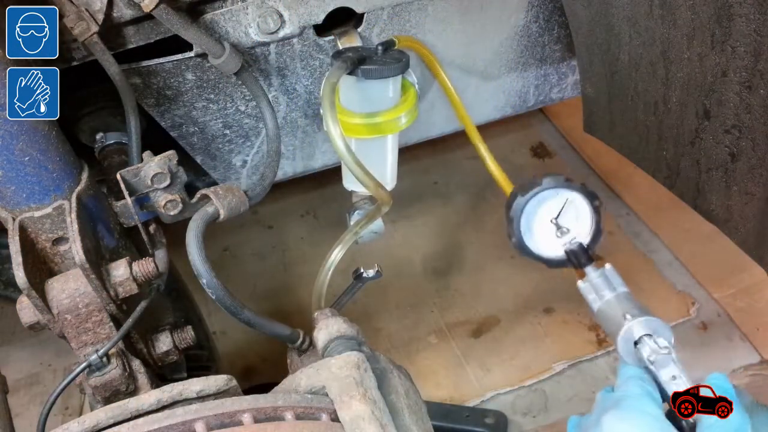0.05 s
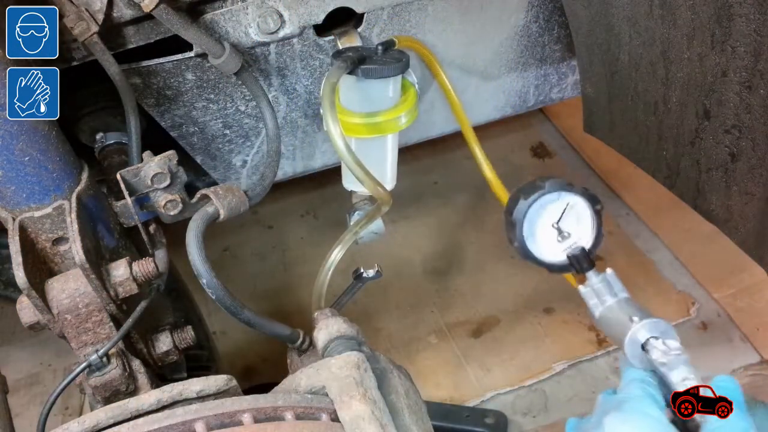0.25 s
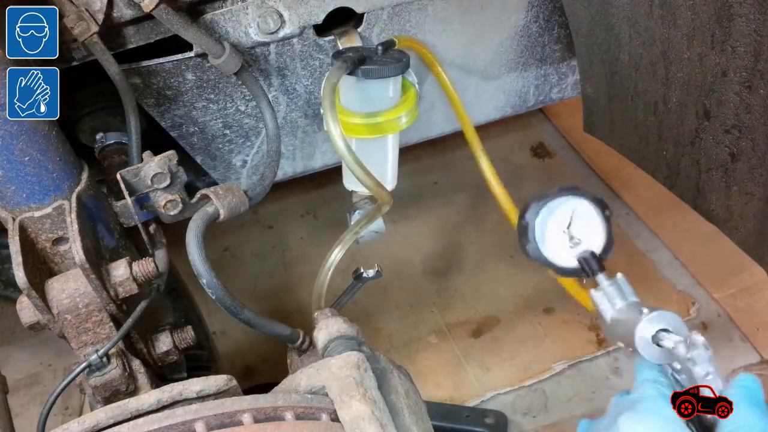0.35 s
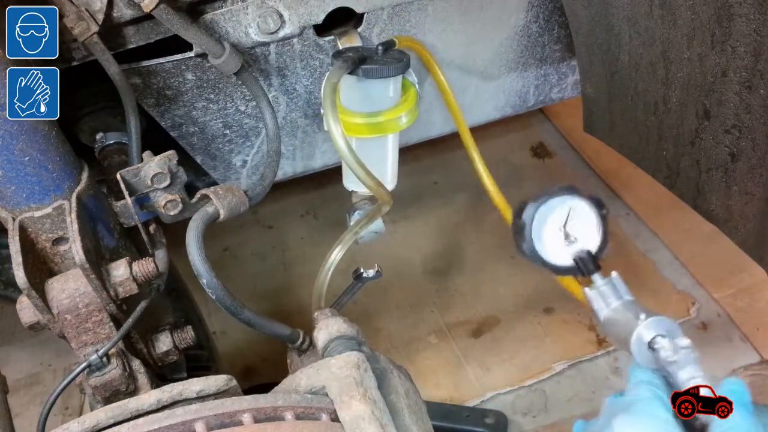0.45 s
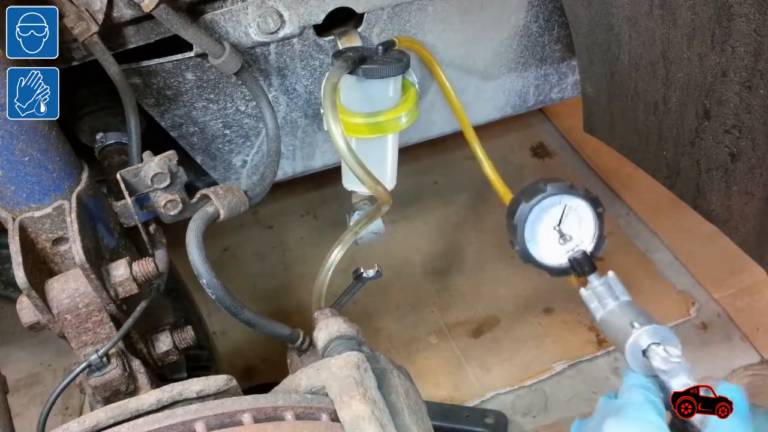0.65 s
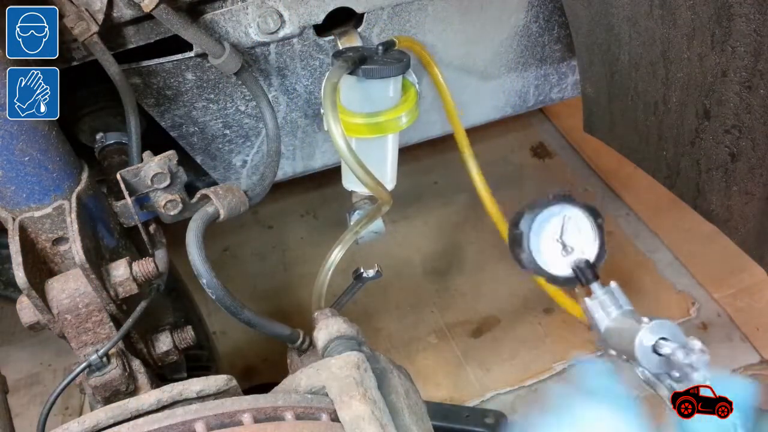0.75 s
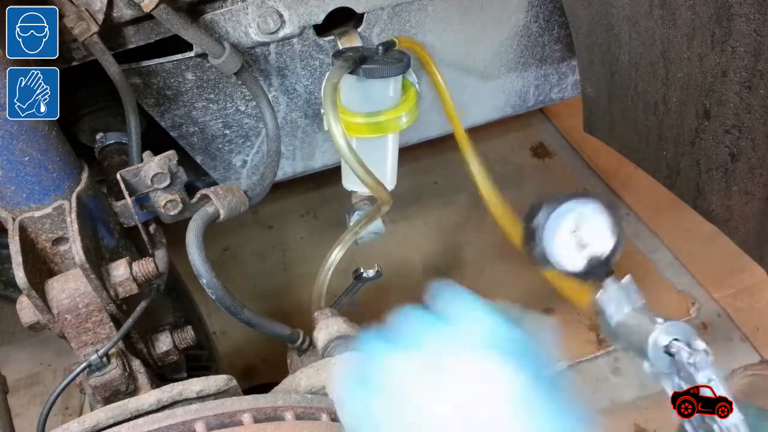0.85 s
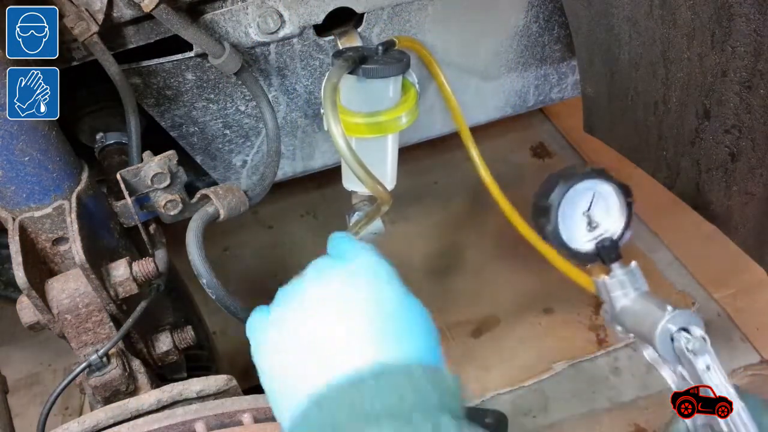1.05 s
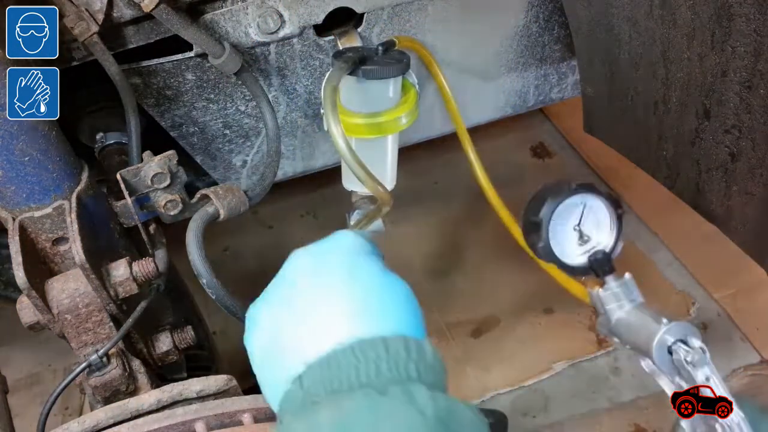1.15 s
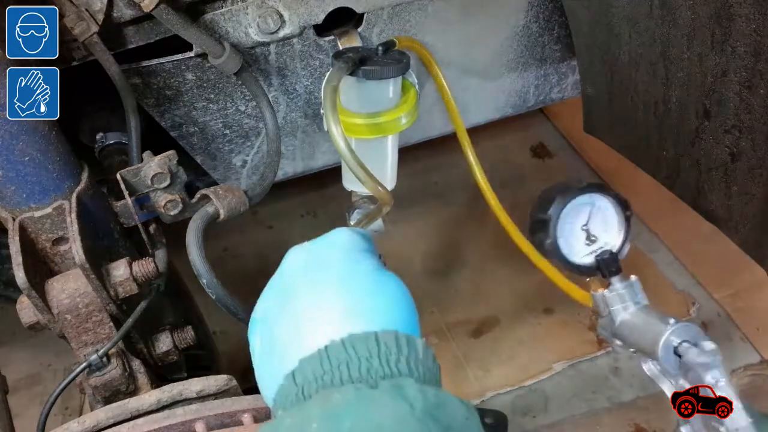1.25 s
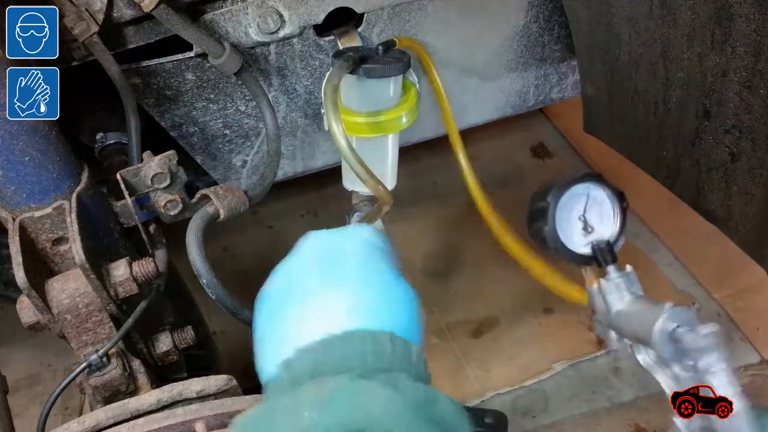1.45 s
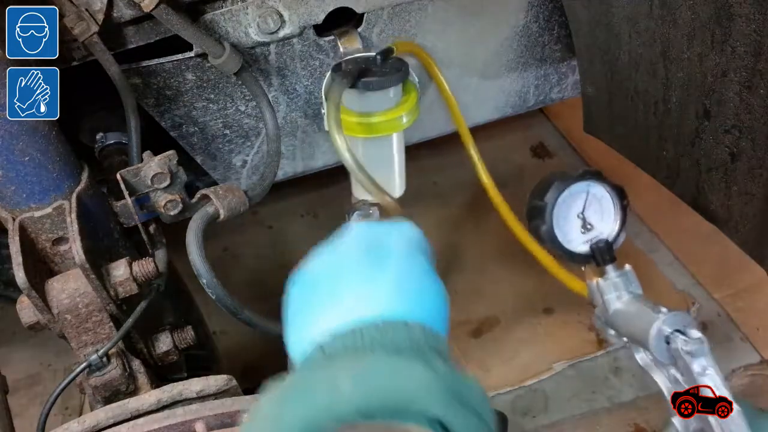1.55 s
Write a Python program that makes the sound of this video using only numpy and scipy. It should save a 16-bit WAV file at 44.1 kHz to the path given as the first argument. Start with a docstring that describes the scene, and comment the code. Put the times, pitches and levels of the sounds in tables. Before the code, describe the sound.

A hand vacuum pump squeezed three times, each a dull knock and sharp airy hiss

```python
"""In a quiet workshop, a hand vacuum pump is squeezed three times close by. Each squeeze starts with a dull
knock: a short push that makes the pump body ring. Then air jets out of the exhaust valve, made of noise
shaped by the resonances of the barrel; after the last squeeze the valve leaks a thin, high hiss.
Faint sucks of air come before the first two squeezes. The spring squeaks, the handle ticks,
and a glove and a sleeve rustle (short or long noises) over a low room hum."""
import sys
import numpy as np
from scipy import signal
from scipy.fft import rfft, irfft
from scipy.io import wavfile
from scipy.ndimage import uniform_filter1d

SR = 44100
rng = np.random.default_rng(int(sys.argv[2]) if len(sys.argv) > 2 else 0)


def log_audio(samples):
    """Write samples as a 16-bit WAV file to the path given in sys.argv[1]."""
    # one column per channel
    frames = np.atleast_2d(samples).T
    # limit to full scale, then quantise
    limited = np.clip(frames, -1, 1)
    pcm = np.round(limited * 32767).astype(np.int16)
    wavfile.write(sys.argv[1], SR, pcm)


def nominal_scale(level):
    """Amplitude ratio for a level in decibels (scalar or array-like)."""
    x = np.asarray(level, float) / 20
    return 10 ** x


N = 70560  # samples, 1.6 s


def evened(x):
    """Scale a sound to an rms of 1."""
    return x / np.sqrt(np.mean(x ** 2) + 1e-20)


def read(points, hz):
    """Read a curve of (frequency, value) points along a logarithmic frequency axis."""
    f, value = np.transpose(points)
    return np.interp(np.log(hz + 1), np.log(f + 1), value)


def add(mix, start_s, sound):
    """Add a sound into the mix at its start time, cut off at the end of the mix."""
    part = mix[:, round(start_s * SR):][:, :sound.shape[-1]]
    part += sound[..., :part.shape[1]]


def pan(db):
    """Left and right gains that differ by db; positive is louder on the left."""
    return nominal_scale(np.array([[db / 2], [-db / 2]]))


def noise(gain, same, size=N):
    """Two channels of noise with the spectrum gain(hz), rms 1; same is how alike they are, 0 to 1."""
    hz = np.fft.rfftfreq(size, 1 / SR)
    a, b = rfft(rng.standard_normal((2, size)))
    alike = np.clip(same(hz) if callable(same) else same, 0, 1)
    right = alike * a + np.sqrt(1 - alike ** 2) * b
    return evened(irfft(np.array([a, right]) * gain(hz), size))


def hiss(modes, same, spread=1):
    """Air turbulence: noise colored by resonances, with a level that gusts at random."""
    def gain(hz):
        power = 0
        for mode_hz, width_hz, db, left_right_db in modes:
            off_center = 2 * (hz - mode_hz) / width_hz / spread
            power = power + (nominal_scale(db) * pan(left_right_db)) ** 2 / (1 + off_center ** 2) ** 2
        return np.sqrt(power)

    gust_db, gust_hz = 1.5, 60  # rms swing, and where faster gusts start to weaken
    gust = noise(lambda hz: 1 / (1 + (hz / gust_hz) ** 2), 0.54)[0]
    return noise(gain, same) * nominal_scale(gust_db * gust)


def level(tables, *cols):
    """Gain over time from curve tables, adding the dB of the given columns; silent outside each curve."""
    t, out = np.arange(N) / SR, np.zeros(N)
    for rows in tables:
        rows = np.array(rows)
        out += nominal_scale(np.interp(t, rows[:, 0], rows[:, list(cols)].sum(1), -200, -200))
    return uniform_filter1d(out, size=150)


def grainy(size):
    """Fast gain flicker, as from many small fibres."""
    grain_db = 2.5  # dB per unit of grain
    grain = np.repeat(rng.exponential(1, size // 18 + 1), 18)[:size]
    return nominal_scale(grain_db * (uniform_filter1d(grain, size=40) - 0.5))


# Range of delays of close reflections: shortest_s, longest_s
ECHO_DELAYS = (.003, .016)


def echoes(x):
    """A few close reflections off nearby surfaces ripple the spectrum."""
    count, echo_db = 12, -16  # level of each echo next to the direct sound
    taps = np.zeros(SR // 20)
    places = (SR * rng.uniform(*ECHO_DELAYS, size=count)).astype(int)
    taps[places] = nominal_scale(echo_db) * rng.choice([-1., 1.], size=count)
    taps[0] = 1  # direct sound
    return signal.oaconvolve(x, taps[None] / np.linalg.norm(taps), axes=1)[:, :N]


# Exhaust air, one curve per squeeze: time_s, level_db, then bands over that level: treble_db, middle_db, top_db
FLOW_CURVES = [
    [(0.18, -74, -9, -8, -10), (0.196, -65.5, 9, 1, 3), (0.206, -52, 6.5, 2, 3), (0.221, -40, 5, 1, 2),
     (0.233, -39, 8.5, 1, 7), (0.317, -40.5, 4.5, -0.5, -0.5), (0.347, -49.5, 6.5, 5, 5.5),
     (0.384, -54.5, 2, -2, -3), (0.42, -80.5, 9, 8, -3)],
    [(0.645, -80, 2, -22, -6), (0.657, -57.5, 6, 1, 6), (0.675, -43, 9, -1, 1.5), (0.711, -39, 6.5, 0, 3.5),
     (0.723, -41.5, 9, -6, 0), (0.747, -41, 5.5, 4, 4.5), (0.798, -50, 3, -1.5, 1.5),
     (0.83, -72, 4, 7.5, 3.5), (0.885, -85.5, 2, 11, -9)],
    [(1.05, -61, -23, -6, -8.5), (1.065, -57.5, -4, -1.5, -3.5), (1.079, -47, 2.5, -5.5, 1),
     (1.111, -41.5, 0, -1.5, 0), (1.119, -40, -5, -10, 1), (1.151, -42, -1, -1, 4.5),
     (1.195, -50.5, 0.5, -2.5, -9), (1.221, -74, 10, 5, 2), (1.235, -68, 4, 1, 20)],
]
# Barrel resonances in four groups: pitch_hz, width_hz, level_db, left_over_right_db
LOW_MODES = [(1908, 136, -1, 10.5), (1790, 37, -4.5, 3.5), (2145, 625, -12, 1.5), (3340, 920, -17.5, -0.5),
             (4390, 300, -14.5, -0.5)]
MIDDLE_MODES = [(5262, 294, 5, 2), (5520, 1330, -5.5, 2.3), (7000, 2700, -22, 0.91)]
TREBLE_MODES = [(10220, 1360, -11.5, 1), (10520, 450, 1.5, 0.5), (10820, 350, -5, 0.047),
                (11440, 480, -3.5, 1)]
TOP_MODES = [(12320, 360, -8, 2), (13040, 450, -4.5, 3), (13550, 460, 1, 3), (14240, 900, -6, 3),
             (15500, 300, -18, 3)]
# Color of the plain turbulence: pitch_hz, gain_db (per Hz)
TURBULENCE_COLOR = [(80, 0.5), (1000, -13), (3000, -23), (8000, -8.5), (12500, 0.5), (16000, 3)]
# Plain turbulence over the flow level, one per squeeze: level_db
TURBULENCE_LEVELS = [-17.5, -20.5, -0.5]
# Widening of the treble and top resonances by the valve opening, one per squeeze: width_factor
VALVE_SPREAD = [1.13, 0.84, 1.9]
# Shift of the middle resonances, lower when the flow is weak, one per squeeze: shift_hz
MIDDLE_SHIFT = [0, 0, -130]


def jet():
    """Air leaving the exhaust valve: barrel resonances over plain turbulence, with close echoes."""
    broad = noise(lambda hz: nominal_scale(read(TURBULENCE_COLOR, hz)), 0.56)
    out = hiss(LOW_MODES, 1.0) * level(FLOW_CURVES, 1)
    squeezes = zip(FLOW_CURVES, TURBULENCE_LEVELS, VALVE_SPREAD, MIDDLE_SHIFT)
    for rows, broad_db, spread, shift_hz in squeezes:
        out = out + broad * level([rows], 1) * nominal_scale(broad_db)
        middle_modes = [(hz + shift_hz, *rest) for hz, *rest in MIDDLE_MODES]
        treble = hiss(TREBLE_MODES, 0.76, spread)
        middle = hiss(middle_modes, 0.96)
        top = hiss(TOP_MODES, 0.53, spread)
        for col, band in ((2, treble), (3, middle), (4, top)):
            out = out + band * level([rows], 1, col)
    return echoes(out)


# Piston knocks: start_s, ring_peak_db, push_s (length of the push)
KNOCK_HITS = [(0.166, -31, .0007), (.6381, -27.5, 0.00081), (1.0513, -31.5, .0012)]
# Ringing tones of the pump body: pitch_hz, level_db (relative), t60_s (time to fall by 60 dB)
BODY_MODES = [(100, -15, 0.11), (263.6, -4, 0.13), (429.6, -11.5, 0.12), (470.2, -5.5, 0.11),
              (490, -13, 0.022), (710, -6, 0.013), (780, 5.5, 0.0083), (1900, 0.5, .015)]


def knocks():
    """A short push rings the tones of the pump body; nearby panels scatter the sound as fading noise."""
    tail_db, tail_t60_s, rise_s = -21, 0.31, 0.004  # scattered sound, next to the peak of the ring
    t, out = np.arange(0, .4, 1 / SR), np.zeros((2, N))
    body = -sum(nominal_scale(db - 60 * t / t60_s) * np.cos(2 * np.pi * hz * t) for hz, db, t60_s in BODY_MODES)
    for start_s, db, push_s in KNOCK_HITS:
        push = np.hanning(round(push_s * SR) + 2)
        ring = np.convolve(body, push)[:len(t)]
        scatter = noise(lambda hz: 1 / (1 + (hz / 700) ** 2) * hz / (hz + 80), 0.9, size=len(t))
        scatter = scatter * nominal_scale(tail_db - 60 * t / tail_t60_s) * np.minimum(t / rise_s, 1)
        add(out, start_s, nominal_scale(db) * pan(2.5) * (ring / abs(ring).max() + scatter))
    return out


# Valve leak: time_s, level_db
LEAK_CURVE = [(1.2, -49), (1.25, -60), (1.288, -52.5), (1.354, -71), (1.364, -63), (1.42, -96.5)]


def leak():
    """High hiss of the leaking valve, whose lower edge climbs as the pressure evens out."""
    edge_start_hz, climb_start_s, climb_hz_per_s = 8800, 1.271, 80500
    hz, t, z = signal.stft(noise(np.ones_like, .7), SR, nperseg=256)
    edge_hz = edge_start_hz + climb_hz_per_s * np.clip(t - climb_start_s, 0, 1)
    z = z / np.sqrt(1 + (edge_hz / (hz[:, None] + 1)) ** 12)
    # keep the loudness steady while the edge moves
    z = z / np.sqrt(np.mean(abs(z) ** 2, axis=(0, 1)) + 1e-12)
    out = signal.istft(z, nperseg=256)[1][:, :N]
    return evened(out) * level([LEAK_CURVE], 1) * grainy(N)


# Air drawn in, one curve per return of the handle: time_s, level_db
SUCK_CURVES = [
    [(0.014, -67), (0.048, -70.5), (0.068, -62), (0.088, -68), (0.115, -100)],
    [(0.513, -85), (0.523, -57), (0.545, -61.5), (0.562, -71), (0.575, -92)],
]
# Resonances of the drawn-in air: pitch_hz, width_hz, level_db, left_over_right_db
SUCK_RESONANCES = [(2050, 230, 3, 1.3), (4000, 210, -0.5, 1.1), (6330, 500, -5.5, 1),
                   (10420, 1900, 2.5, 0.14), (13300, 6400, -10, 1.7)]


def suck():
    """Air drawn in while the handle springs back: resonant hiss with a grainy flicker."""
    return hiss(SUCK_RESONANCES, 0.72) * level(SUCK_CURVES, 1) * grainy(N)


# Squeaks of the return spring: start_s, length_s, level_db, pitch_hz, octave_db (gain of the tone an octave up)
SPRING_SQUEAKS = [(0.062, 0.075, -62.5, 2020, -27), (0.123, 0.025, -59, 2050, -11),
                  (0.579, 0.033, -59, 2010, -28)]


def squeaks():
    """The return spring squeaks: narrow noise around a pitch and its octave, rising fast and fading."""
    half_width_hz, rise_s = 100, 0.0053  # the octave is twice as wide
    t, out = np.arange(0, .08, 1 / SR), np.zeros((2, N))
    for start_s, length_s, db, hz, octave_db in SPRING_SQUEAKS:
        def tones(f):
            partials = [(1, 0.81), (2, nominal_scale(octave_db))]
            return sum(g / (1 + ((f - k * hz) / k / half_width_hz) ** 2) for k, g in partials)

        shape = np.clip(np.minimum(t / rise_s, 1 - t / length_s), 0, 1) * grainy(len(t))
        band = noise(tones, 0.94, size=SR // 4)[:, :len(t)]
        add(out, start_s, pan(3.1) * band * shape * nominal_scale(db))
    return out


# Small ticks of the handle: start_s, level_db (at the start), pitch_hz (center)
HANDLE_TICKS = [(.022, -59, 680), (.433, -60.5, 1100), (0.524, -58, 11000), (.542, -64, 10900),
                (.565, -67, 11000), (.583, -73, 6500), (.85, -58, 690), (1.052, -61, 6500),
                (1.455, -68.5, 7000), (1.578, -59, 4940)]


def ticks():
    """The handle ticks: bursts of band noise that die away at once, more slowly when low in pitch."""
    decay_s = 0.0027  # time constant from 5000 Hz up
    t, out = np.arange(0, .08, 1 / SR), np.zeros((2, N))
    for start_s, db, hz in HANDLE_TICKS:
        burst = noise(lambda f: np.exp(-np.log((f + 1) / hz) ** 2 / 0.98), 1.0, size=len(t))
        fade = np.exp(-t / decay_s * np.clip(hz / 5000, .35, 1))
        add(out, start_s, burst * nominal_scale(db) * fade)
    return out


# Glove dragging along the handle: start_s, length_s, level_db, from_hz, to_hz, width_hz
GLOVE_SCRAPES = [(0.976, .075, -60, 2710, 3710, 1400), (.99, 0.088, -69.5, 5000, 7970, 3000)]


def scrapes():
    """Grainy friction in a resonance that climbs as the glove slides."""
    out = np.zeros((2, N))
    for start_s, length_s, db, from_hz, to_hz, width_hz in GLOVE_SCRAPES:
        u = np.arange(0, length_s, 1 / SR) / length_s  # progress, 0 to 1
        phase = 2 * np.pi * np.cumsum(from_hz + (to_hz - from_hz) * u) / SR

        def low_noise():
            return noise(lambda f: 1 / (1 + (2 * f / width_hz) ** 2), 0.93, size=SR // 4)[:, :len(u)]

        # two low noises on a cosine and a sine make a noise band around the moving pitch
        band = low_noise() * np.cos(phase) + low_noise() * np.sin(phase)
        add(out, start_s, band * np.sin(np.pi * u) * nominal_scale(db) * grainy(len(u)))
    return out


# Rustles of glove and handle: start_s, rise_s, fall_s, level_db, pitch_hz (center), width_octaves
RUSTLE_EVENTS = [(0.053, 0.012, 0.037, -65.5, 2600, 0.29), (.425, 0.014, 0.28, -74, 501, 0.54),
                 (.845, 0.011, 0.01, -59.5, 12000, 0.65), (0.846, 0.011, 0.04, -69, 2860, 0.12),
                 (0.958, 0.013, 0.035, -72.5, 2600, 0.06), (1.204, 0.009, 0.047, -53, 7200, 0.93),
                 (1.08, 0.015, 0.26, -64.5, 236, 0.51), (1.481, 0.015, 0.033, -66, 1590, 0.24),
                 (1.532, 0.019, 0.095, -67.5, 1530, 0.13), (1.538, 0.0047, 0.019, -59.5, 3591, 0.11),
                 (.685, 0.012, 0.014, -47, 6300, 0.36)]


def rustles():
    """Short scrapes of glove and handle: band noise swelling and fading."""
    out = np.zeros((2, N))
    for start_s, rise_s, fall_s, db, hz, octaves in RUSTLE_EVENTS:
        t = np.arange(0, rise_s + fall_s, 1 / SR)
        ramp = np.clip(np.minimum(t / rise_s, (rise_s + fall_s - t) / fall_s), 0, 1)
        shape = np.sin(np.pi / 2 * ramp) ** 2
        band = noise(lambda f: np.exp(-(np.log2((f + 1) / hz) / octaves) ** 2), 0.84, size=SR // 2)
        add(out, start_s, band[:, :len(t)] * shape * nominal_scale(db) * grainy(SR)[:len(t)])
    return out


# Sleeve and glove moving, one curve per movement: time_s, level_db
CLOTH_CURVES = [
    [(.03, -79), (.08, -71.5), (.16, -73)],
    [(.5, -102), (.53, -60), (.56, -72), (.63, -74.5)],
    [(.92, -75), (1.0, -66), (1.06, -57), (1.2, -58), (1.26, -63), (1.38, -73), (1.44, -82.5), (1.5, -62.5),
     (1.53, -73), (1.545, -63.5), (1.6, -61)],
]
# Color of the cloth noise: pitch_hz, gain_db (per Hz)
CLOTH_SPECTRUM = [(290, -14), (500, -2.5), (1120, -8), (1480, -3), (1890, -1.5), (3470, -7.5),
                  (4690, -19.5), (7670, -23), (15800, -40)]


def cloth():
    """Fabric rubbing: steadily grainy noise under a level curve."""
    rub = noise(lambda hz: nominal_scale(read(CLOTH_SPECTRUM, hz)), 0.98)
    return rub * level(CLOTH_CURVES, 1) * grainy(N) * pan(1.5)


def room(x):
    """Short diffuse tail of the room: the sound spread over fading noise."""
    t60_s, gap_s = 0.067, .004  # time to fall by 60 dB, silence before the tail
    t = np.arange(0, .4, 1 / SR)
    tail = rng.standard_normal((2, len(t))) * nominal_scale(-60 * t / t60_s) * (t > gap_s)
    return signal.fftconvolve(x, tail / np.linalg.norm(tail[0]), axes=1)[:, :N]


# Color of the room background: pitch_hz, gain_db (per Hz)
HUM_SPECTRUM = [(12, -30), (25, 2), (60, -8.5), (140, -11), (270, -17.5), (350, -10), (500, -16),
                (1200, -22.5), (1800, -30.5), (3000, -33), (16000, -42.5)]
# How alike left and right are in the background: pitch_hz, likeness (0 to 1)
HUM_LIKENESS = [(60, 0.85), (240, 0.76), (950, 0.85), (3770, 0.4), (15000, 0.31)]


def hum():
    """Low room background: colored noise wavering in patches of time and pitch."""
    hum_db, patch_db = -63, 2.5  # patch_db is the rms swing
    x = noise(lambda hz: nominal_scale(read(HUM_SPECTRUM, hz)), lambda hz: read(HUM_LIKENESS, hz))
    z = signal.stft(x, nperseg=1024)[2]
    patch = uniform_filter1d(rng.standard_normal(z.shape[1:]), size=8, axis=0)
    patch = evened(uniform_filter1d(patch, size=6, axis=1))
    wavers = (np.arange(len(patch)) > 3)[:, None]  # the lowest four bins stay steady
    x = signal.istft(z * nominal_scale(patch_db * patch * wavers), nperseg=1024)[1][:, :N]
    return evened(x) * nominal_scale(hum_db) * pan(-0.5)


def scene():
    """Everything near the pump, its short room tail, and the room background."""
    pump = jet() + knocks() + leak() + suck() + squeaks() + ticks()
    near = pump + scrapes() + rustles() + cloth()
    room_db = -11
    return near + nominal_scale(room_db) * room(near) + hum()


def band_limit(x):
    """A steep low-pass at the top of the band."""
    return signal.sosfilt(signal.butter(12, 16190, fs=SR, output="sos"), x)


def record(dry):
    """Steep low-pass at 15950 Hz on the finished mix."""
    edge = signal.firwin(1023, 15950, window=("kaiser", 9), fs=SR)
    mix = signal.oaconvolve(dry, edge[None], "same")
    return band_limit(mix)


dry = scene()
out = record(dry)
log_audio(out)
```